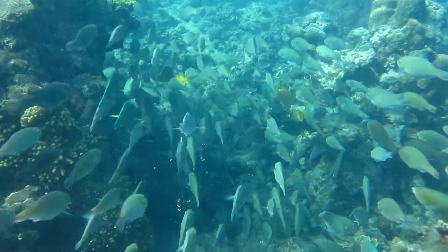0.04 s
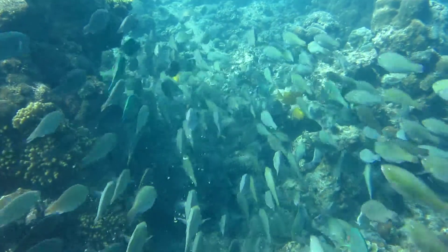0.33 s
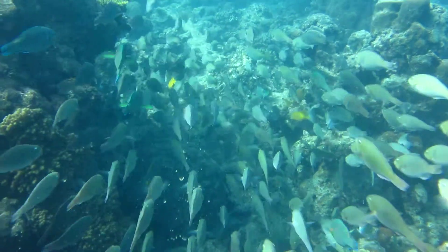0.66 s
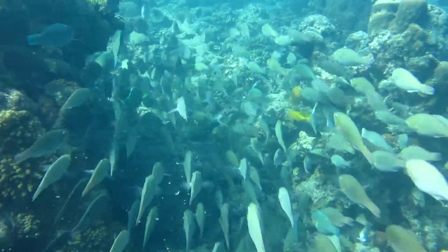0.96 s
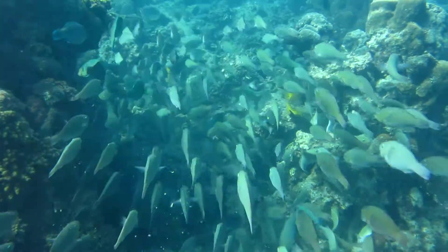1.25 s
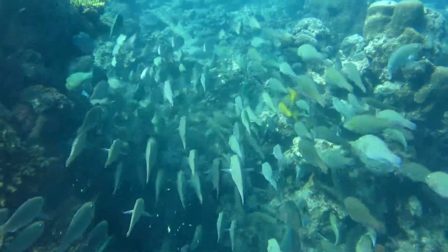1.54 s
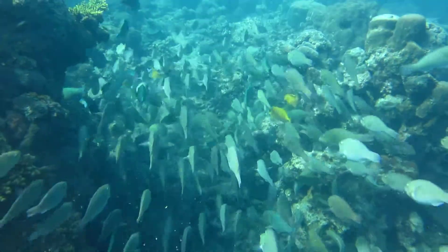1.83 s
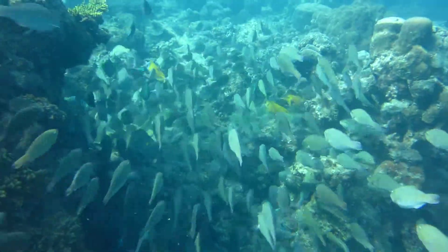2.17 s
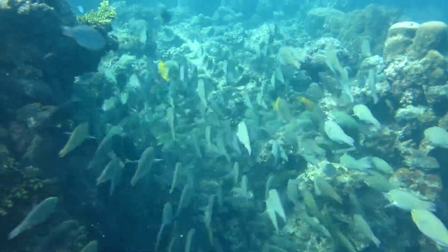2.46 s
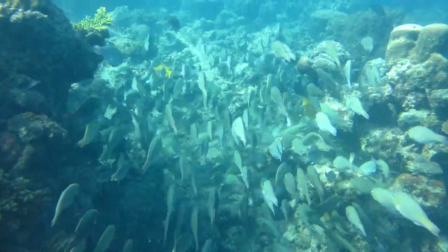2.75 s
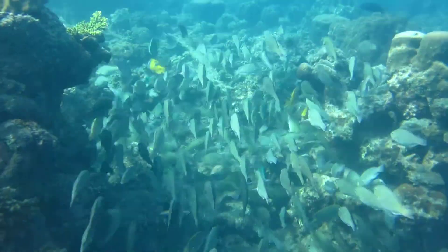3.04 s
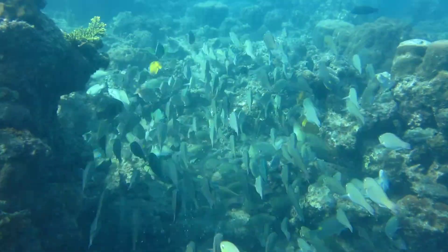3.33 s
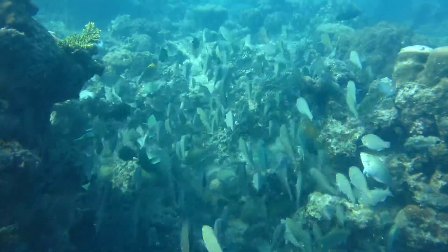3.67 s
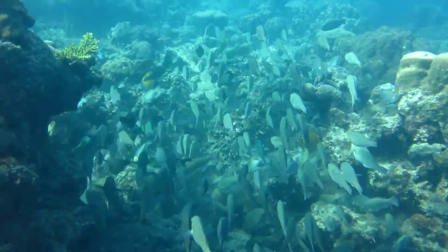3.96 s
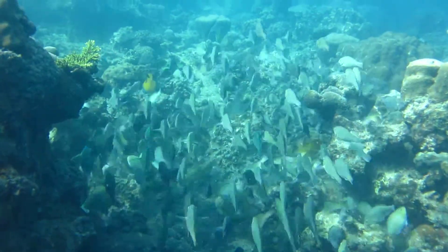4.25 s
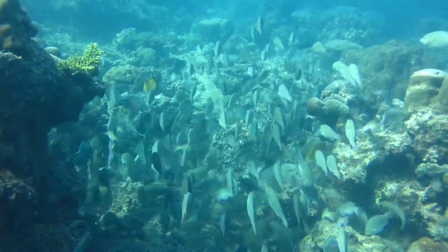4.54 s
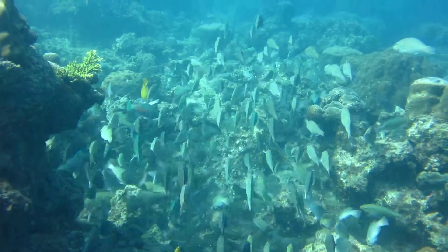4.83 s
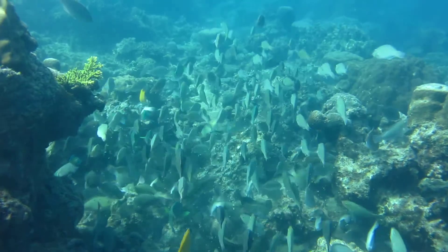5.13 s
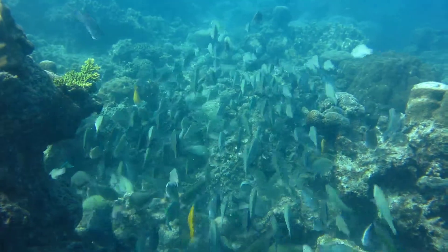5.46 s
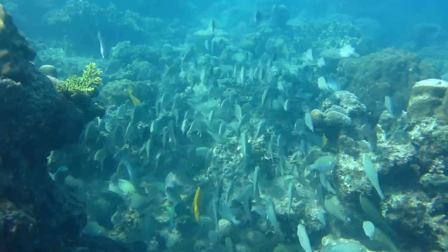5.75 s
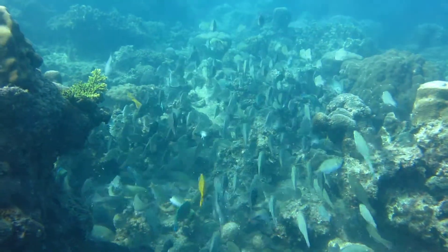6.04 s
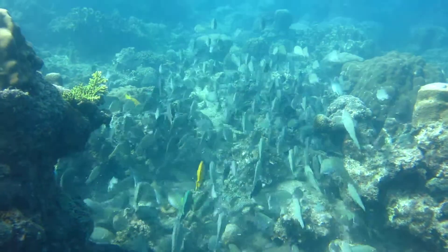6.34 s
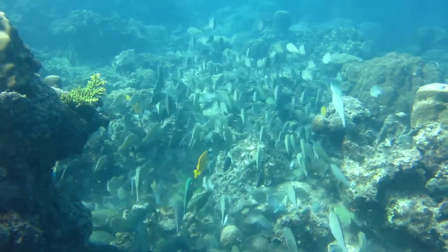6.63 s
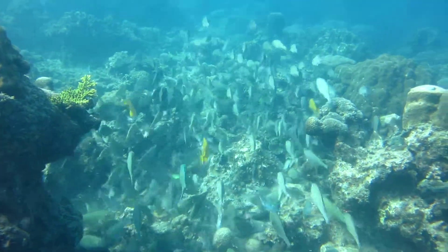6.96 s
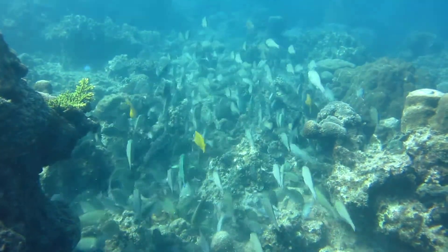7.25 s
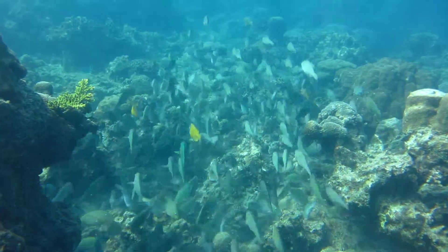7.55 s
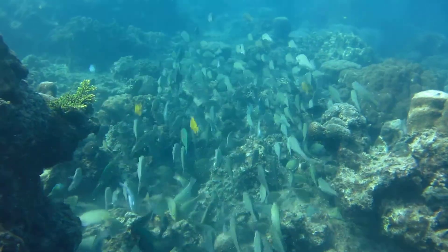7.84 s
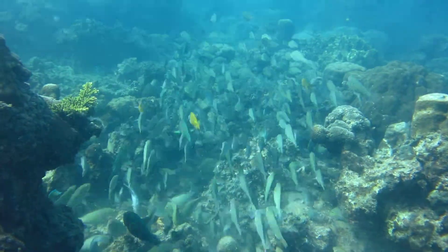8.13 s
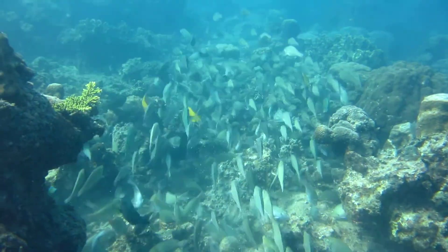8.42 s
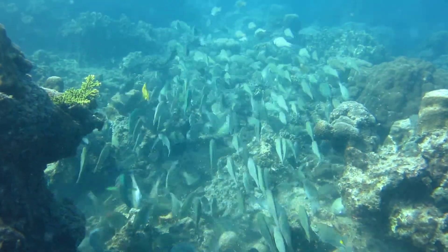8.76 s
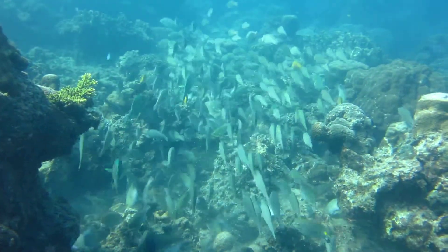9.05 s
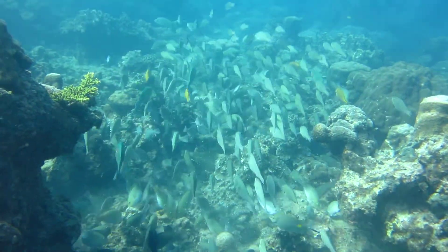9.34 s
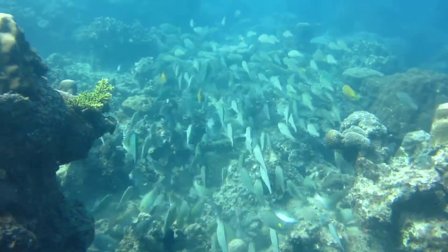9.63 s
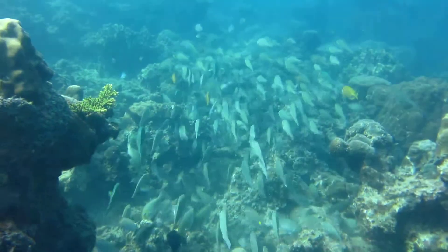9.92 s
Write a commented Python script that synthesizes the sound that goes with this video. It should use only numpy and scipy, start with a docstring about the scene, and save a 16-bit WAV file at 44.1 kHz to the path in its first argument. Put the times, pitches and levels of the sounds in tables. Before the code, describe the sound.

A steady, hollow rush of water heard underwater, dotted with gentle glugs and the scattered clicks of snapping shrimp.

```python
"""A hollow drone near 650 Hz, with soft glugs: a coral reef heard from inside a camera's waterproof housing.
Moving water drives the housing's resonance, glugs, and rings it with short hollow thumps.
Snapping shrimp crackle all around, a few of them close; each snap is a collapsing bubble whose
impulse excites the modes of the housing's shell. Beneath lie churning water, the rumble of the swell,
one dull knock and a faint electronic whine."""
import sys
import numpy as np
from scipy import signal
from scipy.fft import rfft, irfft, next_fast_len
from scipy.io import wavfile

SR = 44100
rng = np.random.default_rng(int(sys.argv[2]) if len(sys.argv) > 2 else 0)


def pcm_store(signal):
    """Save signal as 16-bit PCM."""
    levels = np.round(np.clip(np.atleast_2d(signal), -1, 1) * 32767)
    wavfile.write(sys.argv[1], SR, levels.astype(np.int16).T)


N = 440559

# Levels in the tables are relative unless marked rms.
# spectrum of the housing's drone: frequency_hz, level_db
DRONE_SPECTRUM = [(200, -38.5), (400, -23.5), (480, -11.5), (560, -5.5), (620, -1.5), (660, 1), (705, -3),
                  (770, -11), (860, -18.5), (1000, -25), (1150, -35.5), (1500, -37), (4000, -87)]
# strength of the current pushing on the housing: time_s, level_db
CURRENT_STRENGTH = [(0, -4), (0.6, -3.5), (1.9, -2.5), (3.3, -2.5), (4.7, 0.0), (6.1, -0.5), (6.8, 1),
                    (8.2, -0.5), (8.8, 1.5), (9.9, -3.0)]
# glugs and short hollow thumps of water on the housing: peak_s, pitch_hz, level_db
GLUGS_AND_THUMPS = [(.28, 628, -26), (.335, 531, -27.5), (.985, 690, -28.5), (1.141, 415, -39.5),
                    (1.227, 1020, -47), (1.475, 698, -26.5), (1.714, 770, -36), (1.76, 653, -26),
                    (1.92, 585, -25.5), (2.004, 651, -28), (2.328, 634, -26.5), (2.403, 642, -27),
                    (2.785, 618, -28.5), (4.447, 650, -25.5), (4.729, 603.6, -22), (4.997, 1065, -49),
                            (5.12, 661.3, -26), (5.536, 650, -27), (5.582, 644, -25), (5.829, 533, -30.5),
                    (5.958, 630, -22.5), (6.366, 269, -41.5), (6.75, 510, -29), (6.82, 705, -28.5),
                    (6.887, 647, -26.5), (7.146, 637, -26), (7.353, 350, -35.5), (7.485, 498, -35),
                    (7.663, 395, -35), (7.747, 653, -25), (8.079, 326, -39), (8.417, 339, -38.5),
                    (8.721, 481, -27.5), (8.824, 629, -23), (8.837, 618, -24.5), (8.978, 700, -23.5),
                    (9.104, 288, -37.5), (9.668, 319, -39.5)]
# modes of the shell, excited from the reef or from beside it: pitch_hz, width_hz, reef_db, beside_db
SHELL_MODES = [(1250, 94, -1, -35), (1576, 61, 0, -31), (1894, 240, -1.5, -32), (2267, 230, 2.5, -18),
               (2890, 220, -10.5, -17), (3470, 144, -1, -10), (3765, 130, -8.5, -20), (4220, 290, -8, -8.5),
               (4670, 250, -12.5, -10.5), (5646, 172, 0, -1.5), (7377, 490, -2.5, 2.5),
               (7680, 300, -6, -25), (8460, 470, -4.5, -8), (8930, 310, -5, -21), (10030, 340, -4, -12),
               (11170, 540, -7, -17), (12640, 470, -9.5, -7.5)]
# snaps of nearby shrimp: start_s, level_db, pitch_hz
NEAR_SNAPS = [(0.188, -38, 7240), (0.4424, -39.5, 7900), (0.633, -39.5, 2400), (0.803, -40.0, 7800),
              (0.9342, -36, 2600), (0.9692, -34.0, 3630), (1.0958, -41.0, 3800), (1.988, -39.5, 6900),
              (2.14, -34.5, 3220), (2.201, -36.5, 6000), (2.3221, -41.5, 2400), (2.3918, -39.5, 2790),
              (2.633, -42, 5400), (3.018, -40.0, 5900), (3.3185, -36.5, 3850), (3.608, -36.5, 3130),
              (3.811, -37.5, 2500), (3.834, -38.5, 3200), (3.872, -40, 3900), (4.103, -40.0, 3900),
              (4.323, -38.5, 3000), (4.4888, -38, 8100), (4.6854, -38.0, 3800), (4.81, -37, 8600),
              (5.039, -40.5, 9400), (5.1911, -41, 3800), (5.443, -38, 4600), (5.9112, -35.0, 5530),
              (6.087, -38.5, 3400), (6.094, -34, 7200), (6.1266, -38.5, 5070), (6.314, -38, 5960),
              (6.527, -38, 7100), (6.6598, -38.5, 5760), (6.739, -37.5, 3900), (7.125, -33, 2170),
              (7.4234, -38, 3680), (7.449, -32, 5900), (7.456, -37.5, 4300), (7.4732, -35, 2700),
              (7.5075, -34.0, 3700), (7.5474, -35, 2600), (7.5531, -30.5, 3640), (7.7545, -33.0, 4200),
              (7.988, -40.5, 2760), (8.6875, -31.5, 2270), (9.1132, -39, 6350), (9.3358, -40.0, 3720),
              (9.899, -30.5, 4230)]
# colour of the near snaps: frequency_hz, level_db
NEAR_SNAP_SPECTRUM = [(600, -12), (1500, -3), (2300, 4.5), (3500, 0), (4500, 1.5), (5640, -3.5),
                      (9000, 1.5), (12600, 3), (15000, 4)]
# colour of the distant crackle: frequency_hz, level_db
CRACKLE_SPECTRUM = [(500, -26.5), (1100, 6), (1420, 1), (2200, -1.5), (3500, 2), (5000, 0.5), (5640, -2),
                    (6400, -2.5), (7400, 1), (10000, -1), (12800, 0.5), (13800, 3.5), (16000, 7)]
# spectrum of the churning water: frequency_hz, level_db
CHURN_SPECTRUM = [(60, -26), (140, -5.5), (200, -6), (260, -2), (340, -2.5), (430, 1), (560, -7),
                  (800, -27), (1500, -57)]
# strength of the churning: time_s, level_db
CHURN_STRENGTH = [(0.0, -54), (2.5, -53), (2.95, -50), (6.2, -50), (8.93, -47), (9.99, -53)]
# spectrum of the swell's rumble on the housing: frequency_hz, level_db
RUMBLE_SPECTRUM = [(8, -20), (22, 0.5), (38, 0), (52, -9), (66, -7.5), (82, -4.5), (104, 0), (130, -6),
                   (180, -12), (300, -20.5), (900, -62)]
# surges of the swell that lift the rumble: peak_s, boost_db
SWELL_SURGES = [(.9, 4), (2.22, 4), (4.45, 4), (7.93, 7.5)]
# tones of the camera's electronics: pitch_hz, rms_db
WHINE_TONES = [(7852, -77), (13517, -85)]

HOUSING_HZ, HOUSING_OCTAVES = 650, .38  # centre and half-width of the housing's main resonance


def housing_drone(level_db=-37.0, flutter_db=1.5, flutter_per_s=35):
    """Forced resonance: the current drives the housing at random, and it answers in a narrow band."""
    drone = unit_rms(noise(DRONE_SPECTRUM) * gain_of(flutter_db * wander(flutter_per_s)))
    return gain_of(level_db) * drone * envelope(CURRENT_STRENGTH)


def glug(peak_s, pitch_hz, level_db, phase, glide=.025, linger=1.6, glug_s=.018, thump_s=.006):
    """Transient ringing: a glug or hollow thump of water on the housing, briefest near its own pitch."""
    swell_s = glug_s + (thump_s - glug_s) * bell_curve(pitch_hz, HOUSING_HZ, HOUSING_OCTAVES)
    age = np.arange(-3 * swell_s, 5 * swell_s, 1 / SR) / swell_s  # in swell times, 0 at the peak
    cycles = phase + np.cumsum(pitch_hz * (1 + glide * age)) / SR
    shape = np.exp(-np.where(age < 0, age, age / linger) ** 2)
    start_s = peak_s + age[0] * swell_s
    return start_s, gain_of(level_db) * shape * np.sin(2 * np.pi * cycles)


def glugs_and_thumps(gain_db=0.2, wobble_db=1.2, wobble_per_s=60):
    """Amplitude modulation roughens the glugs and the thumps of water that ring the housing."""
    out = np.zeros(N)
    for row, phase in zip(GLUGS_AND_THUMPS, rng.random(len(GLUGS_AND_THUMPS))):
        add(out, *glug(*row, phase))
    return gain_of(gain_db + wobble_db * wander(wobble_per_s)) * out


def stray_glugs(base_db=-46, boost_db=10, spread_db=6, low_hz=230, high_hz=760, count=30):
    """The current shakes faint glugs loose; resonance lifts those near the housing's own pitch."""
    out = np.zeros(N)
    for when, pitch, size, phase in rng.random((count, 4)):
        pitch_hz = low_hz * (high_hz / low_hz) ** pitch
        resonance_db = boost_db * bell_curve(pitch_hz, HOUSING_HZ, HOUSING_OCTAVES)
        level_db = base_db + resonance_db + spread_db * (size - .5)
        add(out, *glug(when * N / SR, pitch_hz, level_db, phase))
    return out * envelope(CURRENT_STRENGTH)


def bubble_collapse(crack_s, scatter_db, scatter_s, rise_s, size=2048):
    """Cavitation: a shrimp's bubble gives a crack, blunted on its way, then scattered by the coral."""
    t = np.arange(size) / SR
    attack = 1 - np.exp(-t / rise_s)
    decay = np.exp(-t / crack_s) + gain_of(scatter_db) * np.exp(-t / scatter_s)
    return unit_rms(rng.standard_normal(size) * attack * decay)


def shell_response(spectrum, size=2048):
    """The shell's impulse response: its resonance curves add in power, coloured by the given spectrum."""
    hz = abs(np.fft.fftfreq(size, 1 / SR))
    power = sum(gain_of(reef_db) ** 2 / (1 + (2 * (hz - pitch_hz) / width_hz) ** 2)
                for pitch_hz, width_hz, reef_db, _ in SHELL_MODES)
    log_gain = np.log(power) / 2 + np.log(gain_of(level_at(spectrum, hz)))
    minimum_phase = np.exp(np.conj(signal.hilbert(log_gain)))  # makes the response causal
    return np.fft.ifft(minimum_phase).real[:size // 2]


def closest_snap(start_s=1.3684, peak_db=-7.5, rise_s=.0004, echo_db=-15, echo_s=.0072):
    """Free vibration: a snap beside the housing strikes the shell, and each mode rings and decays."""
    t, out = np.arange(2048) / SR, np.zeros(N)
    modes = sum((-1) ** k * gain_of(beside_db) * width_hz
                * np.exp(-np.pi * width_hz * t) * np.sin(2 * np.pi * pitch_hz * t)
                for k, (pitch_hz, width_hz, _, beside_db) in enumerate(SHELL_MODES))
    snap = modes * (1 - np.exp(-t / rise_s))
    snap *= gain_of(peak_db) / abs(snap).max()
    add(out, start_s, snap)
    # the rippled surface smears the echo into a short noise burst
    smear = bubble_collapse(crack_s=.00048, scatter_db=-21, scatter_s=.006, rise_s=.0001)
    echo = signal.fftconvolve(snap, smear / np.linalg.norm(smear))
    add(out, start_s + echo_s, gain_of(echo_db) * echo)
    return out


def near_snaps(gain_db=0.7, focus_db=14, focus_octaves=.8, echo_db=-14, echo_s=.0065, lag_s=.0004):
    """Close snaps ring the shell around their own pitch; reflection at the surface inverts the echo."""
    out = np.zeros(N)
    ring = shell_response(NEAR_SNAP_SPECTRUM)
    for start_s, level_db, pitch_hz in NEAR_SNAPS:
        stretch = (4000 / pitch_hz) ** .5  # low snaps are longer and narrower in band
        crack = bubble_collapse(crack_s=.0006 * stretch, scatter_db=-20, scatter_s=.0077,
                                rise_s=.0004 * stretch)
        rung = signal.fftconvolve(crack, ring)
        hz = np.fft.rfftfreq(len(rung), 1 / SR) + 1
        emphasis_db = focus_db * bell_curve(hz, pitch_hz, focus_octaves / stretch)
        snap = irfft(rfft(rung) * gain_of(emphasis_db), len(rung))[:len(ring)]
        snap *= gain_of(level_db) / np.linalg.norm(snap)
        add(out, start_s + lag_s, snap)
        add(out, start_s + lag_s + echo_s, -gain_of(echo_db) * snap)
    return gain_of(gain_db) * np.sqrt(.0029 * SR) * out  # each snap holds 2.9 ms of energy at its level


def reef_crackle(snaps_per_s=230, snaps_db=-52.5, fizz_db=-55.5, focus_db=8, drift_db=.37, count=120):
    """Superposition: hundreds of small snaps a second ring the shell; the farthest merge into fizz."""
    onsets = np.flatnonzero(rng.random(N) < snaps_per_s / SR)
    sizes = np.minimum(rng.exponential(1, N), 2.95)
    shrimp = rng.integers(0, count, N)[onsets]
    snaps = np.zeros(N)
    for k, pitch_hz in enumerate(np.geomspace(1900, 13000, count)):
        spectrum = rfft(bubble_collapse(crack_s=.00081, scatter_db=-21, scatter_s=.011, rise_s=.00088))
        hz = np.linspace(1, SR / 2, len(spectrum))
        emphasis_db = focus_db * bell_curve(hz, pitch_hz, octaves=.61)
        path_db = 3.0 * signal.resample(rng.standard_normal(24), len(hz))  # each path's peaks and dips
        snap = unit_rms(irfft(spectrum * gain_of(emphasis_db + path_db)))
        spread_db = 5.0 * (pitch_hz / 5000) ** .26  # bright snaps are nearer and vary more in strength
        for onset in onsets[shrimp == k]:
            add(snaps, onset / SR, gain_of(spread_db * sizes[onset]) * snap)
    ring = shell_response(CRACKLE_SPECTRUM)
    crackle = unit_rms(signal.oaconvolve(snaps, ring)[:N])
    fizz = unit_rms(signal.oaconvolve(rng.standard_normal(N), ring)[:N])
    return (gain_of(snaps_db) * crackle + gain_of(fizz_db) * fizz) * gain_of(drift_db * wander(3.6))


def housing_knock(start_s=8.6885, peak_db=-19, pitch_hz=600, ring_s=.0018):
    """Heavy damping: a bump on the housing dies away within a few cycles."""
    t, out = np.arange(2048) / SR, np.zeros(N)
    shape = (t / ring_s) * np.exp(1 - t / ring_s)
    add(out, start_s, gain_of(peak_db) * shape * np.cos(2 * np.pi * pitch_hz * t))
    return out


def churning_water(level_db=-49.8, eddies_db=2.5, eddies_per_s=8.9):
    """Turbulence: low noise whose level fluctuates with the eddies around the housing."""
    churn = noise(CHURN_SPECTRUM) * gain_of(eddies_db * wander(eddies_per_s))
    return gain_of(level_db) * unit_rms(churn * envelope(CHURN_STRENGTH))


def swell_rumble(base_db=-53.5, heave_db=2, heave_per_s=6.4, surge_s=.14):
    """The swell's fluctuating pressure on the housing makes a deep rumble that rises with each surge."""
    t = np.arange(N) / SR
    rumble = unit_rms(noise(RUMBLE_SPECTRUM) * gain_of(heave_db * wander(heave_per_s)))
    surge_db = sum(boost_db * np.exp(-((t - peak_s) / surge_s) ** 2) for peak_s, boost_db in SWELL_SURGES)
    return gain_of(base_db + surge_db) * rumble


def camera_whine():
    """Steady oscillation in the camera's electronics gives thin pure tones."""
    t = np.arange(N) / SR
    return sum(np.sqrt(2) * gain_of(rms_db) * np.sin(2 * np.pi * pitch_hz * t)
               for pitch_hz, rms_db in WHINE_TONES)


def gain_of(db):
    """Decibels to amplitude."""
    return 10 ** (np.asarray(db) / 20)


def unit_rms(x):
    """Normalisation to rms 1."""
    return x / np.sqrt(np.mean(x ** 2) + 1e-20)


def level_at(spectrum, hz):
    """A spectrum's level in dB, interpolated over log frequency."""
    frequency_hz, level_db = np.transpose(spectrum)
    return np.interp(np.log(hz + 1), np.log(frequency_hz + 1), level_db)


def envelope(curve):
    """A level curve interpolated to a gain for every sample."""
    time_s, level_db = np.transpose(curve)
    return gain_of(np.interp(np.arange(N) / SR, time_s, level_db))


def bell_curve(hz, centre_hz, octaves):
    """A Gaussian over log frequency, 1 at the centre."""
    return np.exp(-(np.log2(hz / centre_hz) / octaves) ** 2)


def add(mix, start_s, sound):
    """Superposes a sound on the mix from start_s."""
    part = mix[max(round(start_s * SR), 0):][:len(sound)]
    part += sound[:len(part)]


def noise(spectrum):
    """White noise filtered to the given spectrum, at rms 1."""
    size = next_fast_len(N)
    colour = gain_of(level_at(spectrum, np.fft.rfftfreq(size, 1 / SR)))
    return unit_rms(irfft(rfft(rng.standard_normal(size)) * colour, size)[:N])


def wander(per_s):
    """Low-passed noise of rms 1 that changes about per_s times a second."""
    size = next_fast_len(N)
    lowpass = np.exp(-(np.fft.rfftfreq(size, 1 / SR) / per_s) ** 2)
    return unit_rms(irfft(rfft(rng.standard_normal(size)) * lowpass, size)[:N])


def scene():
    """The pressures of all sources add at one microphone inside the housing."""
    water = housing_drone() + churning_water() + swell_rumble()
    glugs = glugs_and_thumps() + stray_glugs()
    shrimp = reef_crackle() + near_snaps() + closest_snap()
    return (water + glugs + shrimp + housing_knock() + camera_whine())[None]


def record(dry, cutoff_hz=15950):
    """Band limiting: a steep low-pass filter removes the highest treble."""
    lowpass = signal.firwin(511, cutoff_hz, window=("kaiser", 9), fs=SR)
    return signal.oaconvolve(dry, lowpass[None], "same")


dry = scene()
out = record(dry)
pcm_store(out)
```